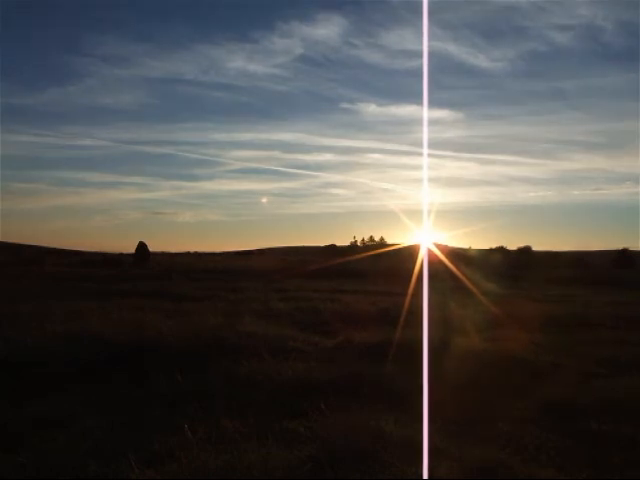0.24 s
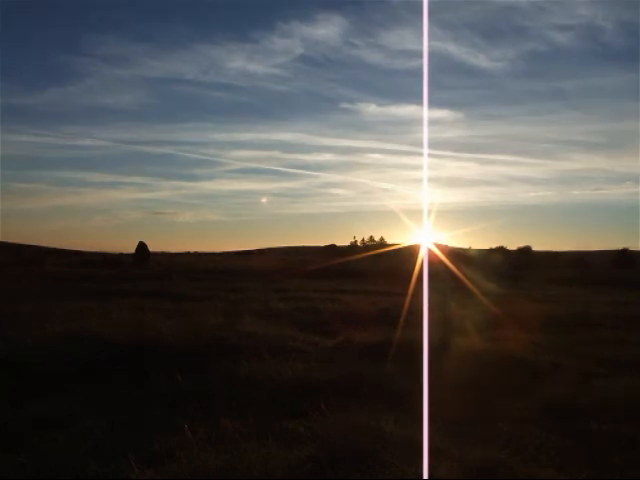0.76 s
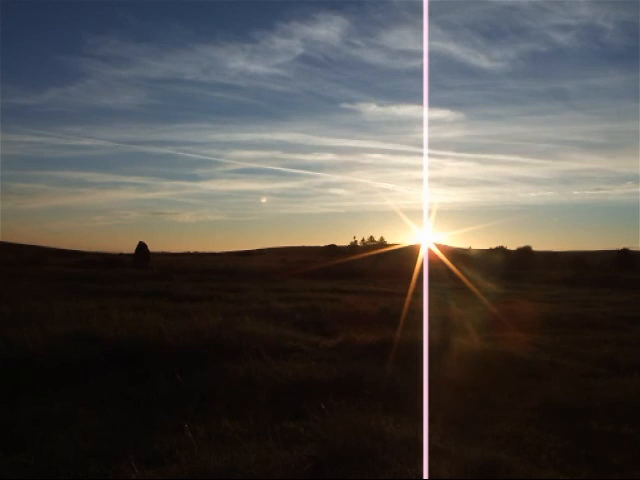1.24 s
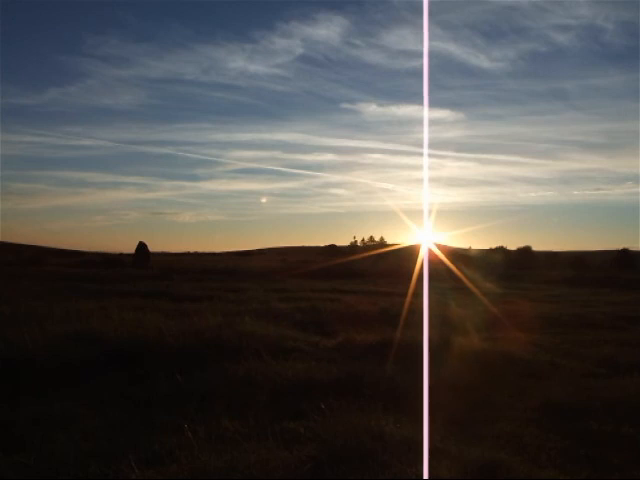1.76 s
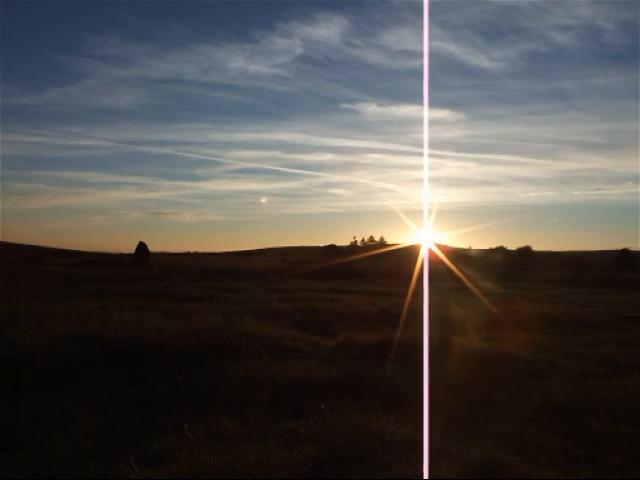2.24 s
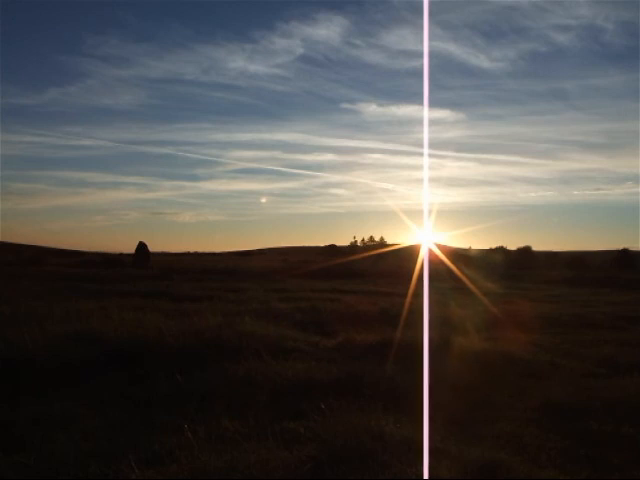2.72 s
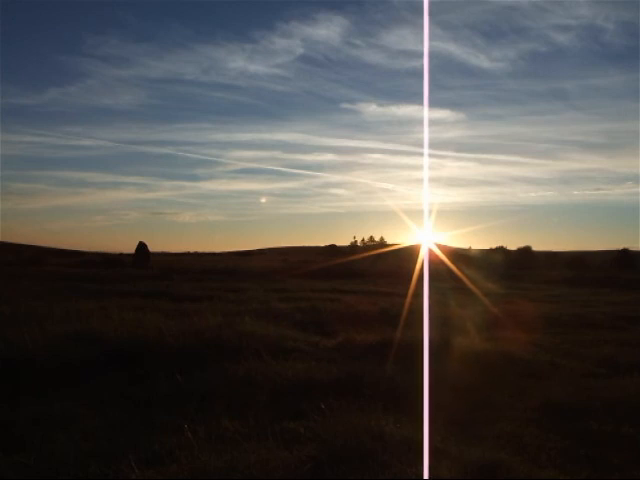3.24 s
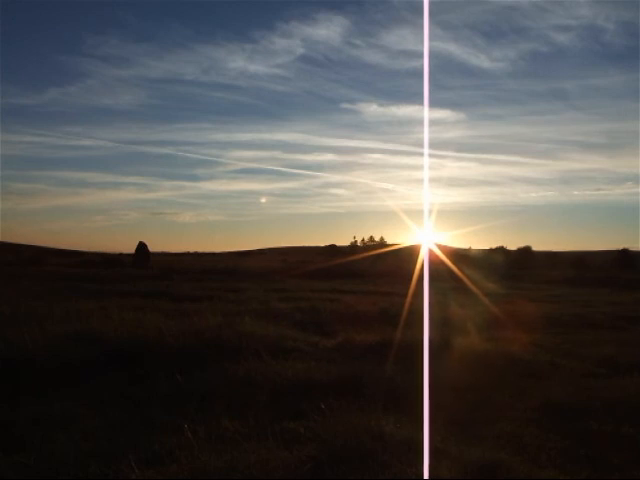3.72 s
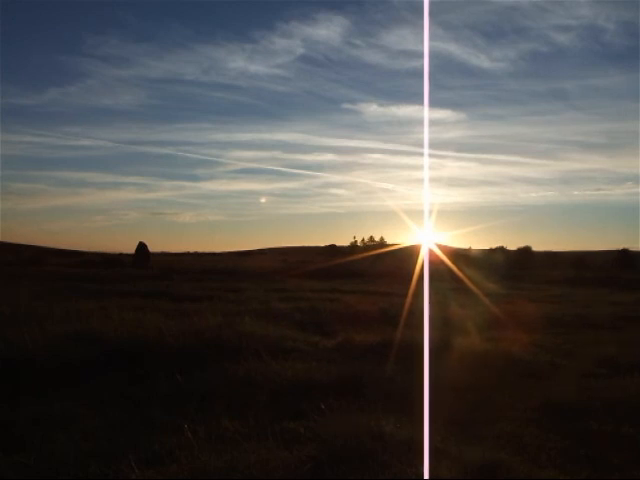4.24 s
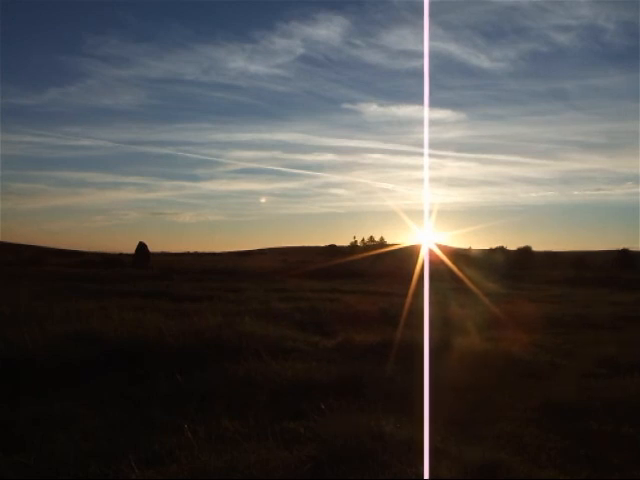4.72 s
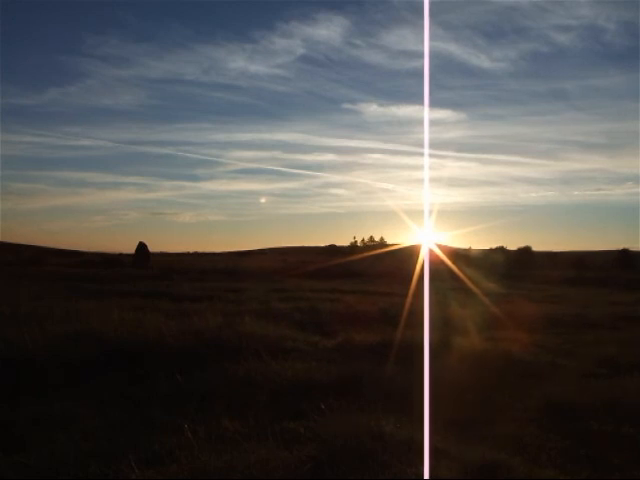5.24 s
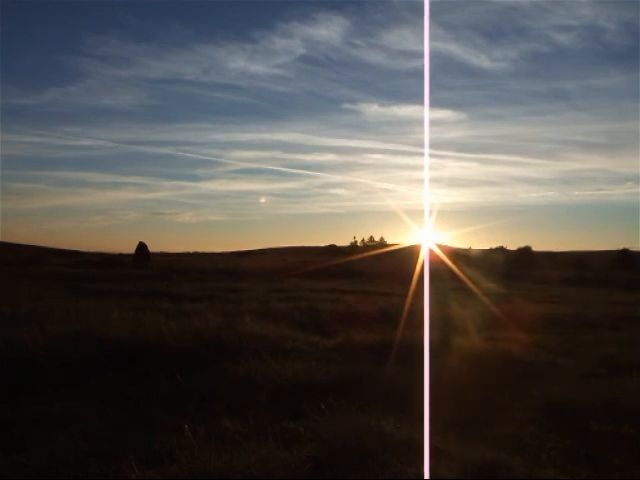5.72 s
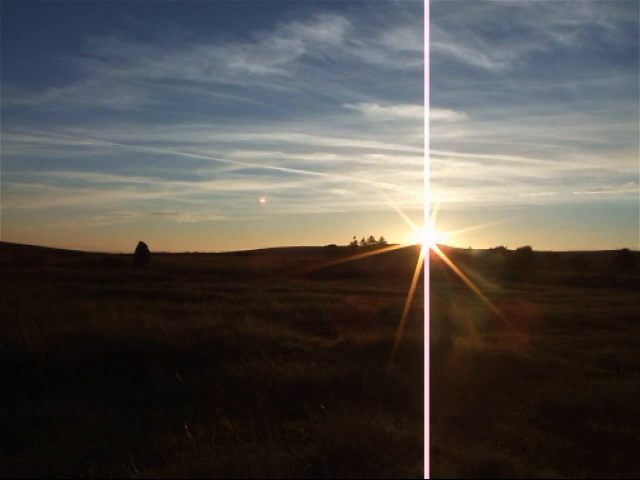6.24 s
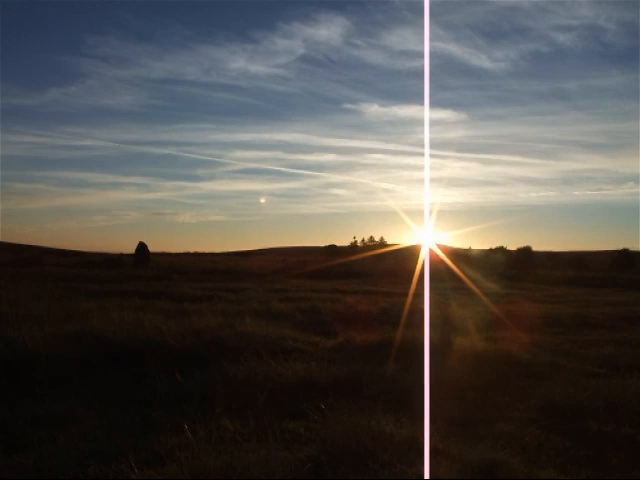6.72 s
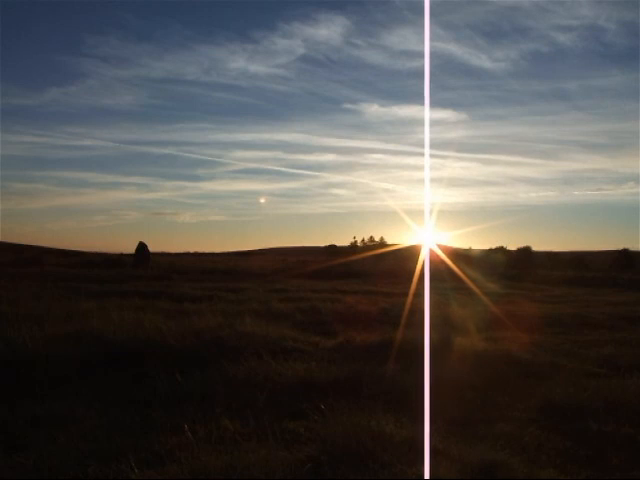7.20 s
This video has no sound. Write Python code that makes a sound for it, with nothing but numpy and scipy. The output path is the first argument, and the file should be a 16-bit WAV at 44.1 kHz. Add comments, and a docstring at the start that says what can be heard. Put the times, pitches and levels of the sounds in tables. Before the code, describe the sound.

Dawn birdsong on open moorland: rapid chirps, buzzes and rattling trills, with repeated down-sliding wader whistles and faint distant twitter.

```python
"""Open moorland at dawn: larks and pipits chirp, trill and warble close by, and a wader whistles again and again.
Gliding sines make the notes, fast pulses the trills, and sliding harmonics in a throat resonance the wader.
Far birds twitter in a soft noise hiss. A near-mono microphone with a low cut, a top cut and a faint whine
takes a few soft bumps; the birds leave a thin scattered tail and one faint echo."""
import sys
import numpy as np
from scipy import signal
from scipy.fft import rfft, irfft
from scipy.io import wavfile

SR = 44100
rng = np.random.default_rng(int(sys.argv[2]) if len(sys.argv) > 2 else 0)


def persist_wave(psi):
    """Save psi, clipped to +-1, as 16-bit WAV."""
    counts = np.round(np.clip(psi, -1, 1) * 32767).astype(np.int16)
    wavfile.write(sys.argv[1], SR, np.atleast_2d(counts).T)


N = 329407
TIME = np.arange(N) / SR
OPPOSITE = np.array([[1], [-1]])   # plus on the left, minus on the right


def from_db(db):
    """Decibels to a plain amplitude factor."""
    return 10 ** (np.asarray(db) / 20)


def rms_one(x):
    """Scale a signal to an rms of 1."""
    return x / np.sqrt(np.mean(x ** 2) + 1e-20)


def at_hz(points, hz):
    """Read a spectrum in dB on a log-frequency axis."""
    known_hz, db = np.transpose(points)
    return np.interp(np.log(np.maximum(hz, 1)), np.log(known_hz), db)


def drift(rate):
    """Random wandering with rms 1: straight lines between random points, rate points per second."""
    knots = rng.standard_normal(4000)
    return rms_one(np.interp(TIME * rate, np.arange(len(knots)), knots))


def span(start, length):
    """The samples of a note, its own clock in seconds and its progress 0-1."""
    where = slice(max(0, int(start * SR) + 1), min(N, int((start + length) * SR)))
    t = TIME[where] - start
    return where, t, np.clip(t / length, 0, 1)


def arc(u, first, middle, last):
    """A parabola through three values."""
    ends = (first * (1 - u) - last * u) * (1 - 2 * u)
    return ends + 4 * middle * u * (1 - u)


def fade(t, length, edge):
    """Straight ramps, edge seconds long, at both ends of a note."""
    return np.clip(np.minimum(t, length - t) / edge, 0, 1)


def settle(t, length, first, last, settle_s):
    """A pitch that moves quickly at first and levels out."""
    return first + (last - first) * np.expm1(-t / settle_s) / np.expm1(-length / settle_s)


def cycle(t, u, first_rate, last_rate):
    """Place 0-1 within the current beat of a rhythm that speeds up or slows."""
    return t * (first_rate + (last_rate - first_rate) * u / 2) % 1


def tone(hz, overtone_db=-200):
    """A gliding sine of rms 1, with its octave if asked."""
    phase = 2 * np.pi * np.cumsum(hz) / SR
    return np.sqrt(2) * (np.sin(phase) + from_db(overtone_db) * np.sin(2 * phase))


def add_chirp(out, start, length, hz0, hz1, hz2, db, roundness=0.38, flatness=2.2):
    """Add one swell of a nearly pure tone that glides through three pitches, lingering in the middle."""
    where, t, u = span(start, length)
    bend_hz = hz1 - (hz0 + hz2) / 2
    pitch = hz0 + (hz2 - hz0) * u + bend_hz * (1 - np.abs(2 * u - 1) ** flatness)
    swell = np.abs(np.sin(np.pi * u)) ** roundness
    out[where] += from_db(db) * swell * tone(pitch, overtone_db=-50.0)


def pulsed(t, length, pitch, db, rate0, rate1, duty, rise_hz, roundness=0.54, edge=0.0011):
    """The syrinx (a bird's voice box) opens and shuts; every pulse slides in pitch."""
    pulse = np.minimum(cycle(t, t / length, rate0, rate1) / np.clip(duty, .1, 1), 1)
    opening = np.abs(np.sin(np.pi * pulse)) ** roundness
    level = from_db(db) * fade(t, length, edge) * opening
    return level * tone(pitch + rise_hz * (pulse - .5), overtone_db=-61.0)


# color of the background hiss: pitch_hz, relative level_db (per Hz)
HISS_COLOR = [(300, 0), (450, -1), (800, -1.5), (1600, -2.5), (3000, -1.5), (4500, 0), (6000, -3),
              (7500, -7), (8600, -11.5), (9400, -18.5)]


def hiss():
    """Steady random noise of rms 1, shaped by the color table and falling away steeply above 9300 Hz."""
    hz = np.arange(N // 2 + 1) * SR / N
    top_edge = 1 / np.sqrt(1 + (hz / 9300) ** 80)
    spectrum = rfft(rng.standard_normal(N))
    return rms_one(irfft(spectrum * from_db(at_hz(HISS_COLOR, hz)) * top_edge, N))


# thin electronic tones: pitch_hz, level_db (rms)
WHINE_TONES = [(7799, -81), (7859, -71.5), (7889, -71), (7919, -79), (8081, -80), (8111, -72), (8141, -73),
               (8201, -83)]


def whine():
    """A cluster of faint electronic sines, each wandering slightly in pitch."""
    return sum(from_db(db) * tone(hz + 1.5 * drift(20)) for hz, db in WHINE_TONES)


# far singers: center_hz, pulses_per_s, level_db (rms)
FAR_BIRDS = [(4800, 70, -66), (3350, 62, -68)]


def far_birds(wander_hz=220, phrase_db=6):
    """Distant trills: pulsing tones of wandering pitch that swell and sink in the hiss."""
    out = np.zeros(N)
    for hz, rate, db in FAR_BIRDS:
        uneven_rate = rate * (1 + .15 * drift(6.5))
        pulses = np.sin(np.pi * np.cumsum(uneven_rate) / SR) ** 2
        phrases = from_db(phrase_db * np.clip(drift(6), -3, 1))
        pitch = hz + wander_hz * drift(10) + 120 * drift(300)
        out += from_db(db) * rms_one(pulses * phrases) * tone(pitch)
    return out


def far_chips(low_hz=2700, high_hz=5000, slide_hz=700, shortest_s=.008, longest_s=.035,
              db=-56, spread_db=6, count=60):
    """Faint chirps from far birds, at random times, lengths, pitches, slopes and levels."""
    out = np.zeros(N)
    for when, long, high, slope, loud in rng.random((count, 5)):
        length = shortest_s + (longest_s - shortest_s) * long
        hz, slide = low_hz + (high_hz - low_hz) * high, slide_hz * (slope - .5)
        add_chirp(out, when * N / SR, length, hz + slide, hz, hz - slide, db + spread_db * (loud - .5))
    return out


# the wader's calls (a negative start is already under way at time 0): start_s, length_s,
# top_hz (of the silent fundamental, before unsteadiness), fall_per_s, throat_focus (0-1),
# loss_by_end_db, harmonic_2_db, harmonic_3_db, harmonic_4_db (before throat, swell and effort)
WADER_CALLS = [(-0.35, 0.38, 1240, 1.85, 1, -11, -40, -45.5, -37),
               (0.704, 0.43, 1239, 1.86, 0.97, -11, -36.5, -46, -39),
               (1.808, 0.44, 1252, 1.43, 1, -7.5, -38.5, -48, -36),
               (2.988, 0.41, 1235, 1.84, 0.97, -9, -40, -47, -36.5),
               (3.821, 0.446, 1272, 1.5, 0.95, -6, -40, -48, -38.5),
               (4.349, 0.51, 1254, 0.88, 0.34, -15, -50.5, -45, -32)]
# the wader's throat resonance: pitch_hz, gain_db (at full focus)
THROAT = [(1700, -21.5), (2000, -15.5), (2250, -2.5), (2480, 0), (2900, -2), (3500, -16), (4200, -26.5),
          (5200, -18.5)]


def wader(scoop=0.41, scoop_s=.024, scoop_db=-7, hold_s=.072, knee_s=.1, edge=0.012, swell_s=0.1,
          waver=0.0028, third_s=0.25, third_share=1.0, lowest_hz=1720):
    """A scoop up and a long fall: harmonic after harmonic slides through the throat resonance."""
    out, unsteady = np.zeros(N), 1 + waver * drift(35)
    for start, length, top_hz, fall, focus, loss_db, *harmonic_db in WADER_CALLS:
        where, t, u = span(start, length)
        rise = 1 - scoop * np.exp(-(t / scoop_s) ** 1.2)
        falling_s = np.maximum(t - hold_s, 0)
        sinking = np.exp(-fall * falling_s ** 2 / (falling_s + knee_s))
        pitch = top_hz * rise * sinking * unsteady[where]
        effort = from_db(loss_db * u ** 2 + scoop_db * np.exp(-t / scoop_s)) * fade(t, length, edge)
        for k, db in enumerate(harmonic_db, 2):
            swell = 1
            if k == len(harmonic_db) + 1:   # the top harmonic comes late
                swell = 1 - np.exp(-(t / swell_s) ** 2)
            if k == 3:   # the third sinks after the scoop and returns
                after_scoop = 1 - np.exp(-(t / scoop_s) ** 4)
                swell = 1 - third_share * focus * np.exp(-(t / third_s) ** 4) * after_scoop
            beak = 1 / (1 + (lowest_hz / (k * pitch)) ** 20)   # radiates little below lowest_hz
            throat_db = focus * at_hz(THROAT, k * pitch)
            out[where] += effort * swell * beak * from_db(db + throat_db) * tone(k * pitch)
    return out * from_db(1.1 * drift(60))


# notes with a fast vibrato: kind, start_s, length_s, start_hz, middle_hz, end_hz,
# first_swings_per_s, last_swings_per_s, first_depth (0-1), last_depth (0-1), start_db, middle_db, end_db
# (pitches and levels are the slow arc under the swings)
WARBLES = [("twin", .0645, .15, 4130, 4440, 4300, 48.5, 44, 0.78, 1, -40, -36, -55),
           ("zigzag", .4218, .094, 5330, 4750, 4450, 128, 97, .3, 1, -32, -30.5, -39),
           ("zigzag", .5537, .095, 5330, 4750, 4400, 139, 89, .3, 0.91, -29.5, -32.5, -38),
           ("scallop", 2.537, 0.11, 4980, 4250, 3950, 63, 56, 0.93, .4, -28, -37, -38.5),
           ("toothed", 3.0605, .24, 4560, 4170, 4050, 51.3, 57, 0.9, 0.93, -33, -37, -43.5),
           ("rasp", 3.3722, .081, 5400, 4790, 4850, 96, 97, .7, 0.92, -36.5, -32.5, -34),
           ("rasp", 3.8337, .12, 4600, 4830, 4780, 104, 94, 0.92, 0.89, -37.5, -31, -34)]
# one swing of each kind of warble: share_of_swing (0-1), offset_hz (at depth 1), offset_db
SWINGS = {"twin": [(0, -950, -16), (.17, -500, -5.5), (.32, 750, 5.5), (.49, -500, -1), (.68, 1150, 0),
          (.85, -450, -1), (1, -950, -16)], "zigzag": [(0, -500, 3), (.35, 226, 2), (.55, 515, -5),
          (1, -500, 1.5)], "scallop": [(0, 329, -5), (.3, -150, 1), (.6, -120, -1), (1, 330, -5)],
          "toothed": [(0, -320, -4.5), (.3, -33, -1.5), (.6, 238, 0.5), (.7, -280, -6), (.81, 779, -2),
          (.92, -280, 1.5), (1, -320, -1.5)], "rasp": [(0, 1252, -19), (.15, 652, -1), (.3, -50, 5),
          (.48, -680, -6), (.68, -100, -3), (.85, 301, -19), (1, 503, -41)]}


def warbles(edge=.003, waver_hz=50):
    """One swing of pitch and level repeats quickly along a slow arc, widening or narrowing as it goes."""
    out, waver = np.zeros(N), waver_hz * drift(200)
    for kind, start, length, hz0, hz1, hz2, rate0, rate1, depth0, depth1, *db in WARBLES:
        where, t, u = span(start, length)
        share, swing_hz, swing_db = np.transpose(SWINGS[kind])
        beat = cycle(t, u, rate0, rate1)
        depth = depth0 + (depth1 - depth0) * u
        level = from_db(arc(u, *db) + np.interp(beat, share, swing_db)) * fade(t, length, edge)
        pitch = arc(u, hz0, hz1, hz2) + depth * np.interp(beat, share, swing_hz) + waver[where]
        out[where] += level * tone(pitch)
    return out


# the lark's motif (small arch, flick, up-tick, wide arch with a soft lead-in, down-slur),
# one list of points per note: time_s (unstretched), pitch_hz (untransposed), relative level_db
MOTIF = [
    [(.004, 2900, -11.5), (.007, 3930, -2), (.012, 4550, -3.5), (.017, 4680, 0.5), (.022, 4300, -3.5),
     (.027, 3200, -10.5)],
    [(.037, 6100, -14), (.04, 5350, 1.5), (.0435, 4900, -4.5)],
    [(.081, 2800, -16), (.084, 4100, -0.5), (.087, 4650, -10)],
    [(.1, 2850, -15), (.11, 3520, -6), (.116, 4500, -1), (.124, 4790, -2), (.139, 4890, -0.5),
     (.153, 4450, -1), (.163, 3400, -11)],
    [(.168, 6000, -12), (.171, 5200, 0.5), (.175, 4700, -1.5), (.186, 3300, -15)],
]
# each time it is sung: start_s, time_stretch (factor), transpose_hz, level_db
MOTIF_TIMES = [(0.1546, 0.99, -25, -30), (0.4275, 0.99, 71.5, -32.5), (1.2638, 1.01, -68.5, -34),
               (1.528, 1.034, 148, -32.5), (2.475, .985, -59.5, -39.5), (2.738, 1, 15, -37),
               (3.5191, 1.012, 21, -33.5)]


def motifs(edge=.001):
    """The same five gliding notes each time, a little faster or slower, higher or lower."""
    out = np.zeros(N)
    for start, stretch, shift_hz, db in MOTIF_TIMES:
        for note in MOTIF:
            s, hz, note_db = np.transpose(note)
            course = stretch * (s - s[0])
            where, t, u = span(start + stretch * s[0], course[-1])
            level = from_db(db + np.interp(t, course, note_db)) * fade(t, course[-1], edge)
            out[where] += level * tone(shift_hz + np.interp(t, course, hz), overtone_db=-54.0)
    return out


# straight slurs and pips: start_s, length_s, start_hz, end_hz, level_db
SLIDES = [(0.683, 0.0045, 4720, 5160, -31), (0.812, 0.043, 4660, 4290, -30.5),
          (0.8574, 0.026, 4770, 4230, -29.5), (1.914, 0.014, 4450, 4660, -35.5),
          (2.51, 0.03, 4700, 5000, -31.5), (2.633, .05, 4000, 3780, -39.5),
          (3.488, 0.0053, 4160, 5240, -32.5), (3.583, 0.0084, 4700, 5250, -30.5),
          (3.6056, .012, 5170, 5040, -26.5), (3.629, 0.012, 5290, 4970, -26.5),
          (3.652, 0.013, 5320, 5030, -26), (5.661, 0.0071, 4420, 4700, -33),
          (5.924, 0.014, 5250, 4330, -34), (6.187, 0.0026, 2300, 3200, -38),
          (6.435, 0.0054, 5240, 4000, -40), (6.465, .0086, 5000, 4350, -32),
          (7.426, 0.006, 4350, 4700, -38), (7.4318, 0.0031, 5200, 6000, -37.5),
          (5.678, 0.0046, 4400, 3500, -41), (5.693, 0.027, 2870, 2550, -50),
          (6.477, 0.006, 4470, 3000, -42), (5.935, 0.012, 3880, 2500, -47), (6.097, 0.022, 3200, 2190, -47),
          (6.173, 0.0046, 2500, 3200, -45)]
# bowed notes, arched or dipped: start_s, length_s, ends_hz, middle_hz, level_db
BOWS = [(3.016, 0.019, 5980, 5550, -34), (3.036, 0.025, 5650, 4770, -30.5),
        (3.7066, 0.069, 4060, 4630, -32.5), (5.949, 0.016, 1880, 2880, -43)]
# far low hoots: start_s, length_s, pitch_hz, level_db
HOOTS = [(4.377, 0.18, 666, -64), (4.595, 0.21, 665, -65.5)]


def single_notes():
    """Lone chirps: straight slurs, bowed notes, and far hoots on a level pitch."""
    out = np.zeros(N)
    for start, length, hz0, hz1, db in SLIDES:
        add_chirp(out, start, length, hz0, (hz0 + hz1) / 2, hz1, db)
    for start, length, end_hz, middle_hz, db in BOWS:
        add_chirp(out, start, length, end_hz, middle_hz, end_hz, db)
    for start, length, hz, db in HOOTS:
        add_chirp(out, start, length, hz, hz, hz, db)
    return out


# rattles of dipped pulses: start_s, length_s, base_hz, opening_drop_hz, fall_hz_per_s,
# first_period_s, slowing_time_s, level_db, fade_db_per_s
RATTLES = [(.692, .035, 4070, 520, 2500, .0098, .2, -33.5, 0),
           (0.753, .043, 4200, -4, 1490, .01, .23, -34.5, 0),
           (4.734, .31, 4750, 777, 5450, 0.0081, .125, -28, 94),
           (5.0858, .29, 4590, 640, 4700, .0087, .135, -29.5, 131),
           (6.009, .056, 4390, 2, 2500, 0.0091, .11, -37.5, 2),
           (6.3134, .077, 4910, 200, 15900, .0087, .2, -31, 599),
           (6.5547, .26, 4670, 458, 6970, 0.0083, 0.13, -31, 136),
           (6.873, .31, 4700, 349, 8450, 0.0089, .13, -34.5, 86)]


def rattles(settle_s=0.025, hold_s=0.046, widen_s=.008, pulse_s=0.0084, lowest_hz=3400, softest_db=-46.5,
            dip_hz=(350, -280, 520), narrow_s=0.3, clipped=.35, opening_s=.018):
    """Short ticks open into V-shaped pulses that nearly touch, then draw apart while pitch and level sink."""
    out = np.zeros(N)
    for start, length, base_hz, drop_hz, fall, period, slowing_s, db, fade_rate in RATTLES:
        t = 0
        while t < length:
            hz = max(base_hz - fall * t + drop_hz * np.exp(-t / settle_s), lowest_hz)
            level_db = max(db - fade_rate * max(t - hold_s, 0), softest_db)
            opened = 1 - clipped * np.exp(-t / opening_s)
            dip = np.multiply(dip_hz, opened ** 2 * np.exp(-t / narrow_s))
            add_chirp(out, start + t, pulse_s * opened, *(hz + dip), level_db, roundness=0.7, flatness=1.36)
            t += period + widen_s * (1 - np.exp(-(t / slowing_s) ** 2.2))
    return out


# even buzzes: start_s, length_s, start_hz, end_hz (before the droop), first_pulses_per_s,
# last_pulses_per_s, sounding_share (0-1 of a period), start_db, end_db (before the droop)
BUZZES = [(0.9258, 0.48, 3490, 3600, 58.5, 56.5, 0.4, -43, -48),
          (1.937, 0.079, 4410, 4234, 87, 84, 0.81, -34, -37.5),
          (2.005, 0.36, 4250, 4140, 83, 82, 0.76, -36, -36),
          (5.765, 0.457, 4517, 4070, 56.7, 51.4, 0.6, -30.5, -38.5),
          (6.235, 0.074, 4040, 3700, 95, 62, 0.61, -50, -46),
          (6.384, 0.24, 3100, 3400, 36, 43, 0.65, -49, -52),
          (6.691, 0.16, 4160, 3500, 45, 36, 0.95, -50, -50),
          (3.806, 0.026, 4130, 3830, 110, 104, 0.85, -40, -43)]


def buzzes(settle_s=.08, rise_hz=110, droop_s=0.037, droop_hz_per_s=300, droop_db_per_s=12):
    """Trains of nearly level pulses; the longer the buzz, the more it droops at its very end."""
    out = np.zeros(N)
    for start, length, hz0, hz1, rate0, rate1, duty, db0, db1 in BUZZES:
        where, t, u = span(start, length)
        tired = length * np.exp((t - length) / droop_s)
        pitch = settle(t, length, hz0, hz1, settle_s) - droop_hz_per_s * tired
        level_db = db0 + (db1 - db0) * u - droop_db_per_s * tired
        out[where] += pulsed(t, length, pitch, level_db, rate0, rate1, duty, rise_hz)
    return out


# two-note calls: start_s, first_hz, first_db, second_hz, second_db (pitches at the middle of each note)
COUPLETS = [(1.501, 3900, -42.5, 3150, -54), (2.7267, 4270, -37, 3000, -51),
            (2.818, 4250, -35.5, 3060, -48), (2.912, 4184, -37.5, 2880, -49),
            (3.511, 4050, -36.5, 3610, -40.5)]


def couplets(first_s=.018, second_s=.035, scoop_hz=300, fall_hz=180):
    """A short scooped note, and straight after it a lower, softer one that sinks."""
    out = np.zeros(N)
    for start, high_hz, high_db, low_hz, low_db in COUPLETS:
        add_chirp(out, start, first_s, high_hz + scoop_hz / 2, high_hz, high_hz + scoop_hz, high_db)
        add_chirp(out, start + first_s, second_s, low_hz + fall_hz, low_hz, low_hz - fall_hz, low_db)
    return out


# ticks along a slope: start_s, length_s, start_hz, end_hz, first_pulses_per_s, last_pulses_per_s,
# start_db, end_db
LADDERS = [(1.573, 0.035, 3840, 4130, 71, 64, -41, -38.5), (5.7863, 0.042, 5530, 4440, 71, 59, -41, -30),
           (5.829, 0.03, 4320, 3070, 97, 87, -35, -45), (6.083, 0.02, 3850, 3130, 100, 100, -36, -41),
           (7.448, .022, 4800, 4450, 93, 51, -27.5, -35), (5.744, 0.027, 5360, 5020, 132, 125, -40.5, -33),
           (7.3852, 0.026, 5350, 4820, 130, 124, -35.5, -31)]


def ladders(duty=0.53, rise_hz=620):
    """Separate rising ticks, each further along a straight slope of pitch and level."""
    out = np.zeros(N)
    for start, length, hz0, hz1, rate0, rate1, db0, db1 in LADDERS:
        where, t, u = span(start, length)
        pitch, level_db = hz0 + (hz1 - hz0) * u, db0 + (db1 - db0) * u
        out[where] += pulsed(t, length, pitch, level_db, rate0, rate1, duty, rise_hz)
    return out


# bumps on the microphone: start_s, peak_db (of the swell, before the low cut)
BUMPS = [(2.489, -35), (2.5134, -38)]


def bumps(hz=320, ring_s=0.0036):
    """Dull knocks: a low sine that swells and dies within a few cycles."""
    out = np.zeros(N)
    for start, db in BUMPS:
        where, t, u = span(start, 10 * ring_s)
        swell = (t / ring_s) ** 2 * np.exp(2 - 2 * t / ring_s)
        out[where] += from_db(db) * swell * np.sin(2 * np.pi * hz * t)
    return out


# the shape of the lark's repeated down-slur: time_s, drop_hz (rescaled to each slur's range), relative level_db
SLUR = [(0, 12, -11.5), (.004, 17, -4), (.012, 125, -1.5), (.018, 460, -.5), (0.023, 890, 1.5),
        (0.0253, 1000, -3), (.028, 700, -7.5), (.031, 800, -23)]
# the run, which slows a little and tends to creep up: start_s, top_hz, bottom_hz, level_db
SLUR_RUN = [(4.006, 5740, 5070, -26.5), (4.0687, 5760, 5100, -28.5), (4.132, 5790, 4930, -29.5),
            (4.1965, 5780, 4920, -29), (4.2607, 5800, 4950, -27.5), (4.326, 5890, 4900, -27),
            (4.3925, 5930, 4960, -26), (4.4595, 5960, 4840, -26.5), (4.5265, 5910, 4740, -28.5),
            (4.5945, 6050, 5000, -28.5), (4.662, 6080, 4970, -29.5)]


def slur_run(mirror_db=-36):
    """One falling glide over and over, with a faint image of it mirrored about 8 kHz."""
    out = np.zeros(N)
    s, drop_hz, shape_db = np.transpose(SLUR)
    for start, top_hz, bottom_hz, db in SLUR_RUN:
        where, t, u = span(start, s[-1])
        pitch = top_hz - (top_hz - bottom_hz) * np.interp(t, s, drop_hz / drop_hz.max())
        image = from_db(mirror_db) * tone(16000 - pitch)
        out[where] += from_db(db + np.interp(t, s, shape_db)) * (tone(pitch) + image)
    return out


# hooks: start_s, dip_length_s, pulses_per_s (average), peak_hz, level_db (at the middle of the dip)
HOOKS = [(5.09, 0.052, 85, 4900, -42), (5.4138, .072, 84, 4690, -39), (6.7304, 0.051, 74, 4700, -34),
         (7.0537, 0.056, 83, 4820, -32)]
# the dip every hook shares: start_hz, middle_hz, end_hz
HOOK_DIP = (5250, 4000, 4250)


def hooks(duty=.6, rise_hz=800, slowing=0.068, fade_db=6, whistle_s=0.0456, whistle_db=-1, shoulder_hz=700):
    """Pulses swoop down and turn up again, then run into one peaked whistle."""
    out = np.zeros(N)
    for start, length, rate, peak_hz, db in HOOKS:
        where, t, u = span(start, length)
        rates = rate * (1 + slowing), rate * (1 - slowing)
        level_db = db + fade_db * (.5 - u)
        out[where] += pulsed(t, length, arc(u, *HOOK_DIP), level_db, *rates, duty, rise_hz * (1 - u) ** 2)
        side_hz = peak_hz - shoulder_hz
        add_chirp(out, start + length, whistle_s, side_hz, peak_hz, side_hz, db + whistle_db, flatness=1.4)
    return out


# a second singer's flourishes: start_s, spacing_stretch (factor), transpose_hz, level_db
FLOURISHES = [(5.2229, 1.01, 86, -36), (5.5515, 1.04, 32, -35), (6.8631, 1.04, -130, -30),
              (7.1914, 1.04, -110, -30.5)]
# the course of a flourish: share_of_strokes (0-1), pitch_hz (untransposed), rise_in_stroke_hz, relative level_db
FLOURISH_COURSE = [(0, 5250, 1100, -1), (.15, 4650, 1050, 1), (.7, 4100, 800, -3.5), (.9, 3380, 500, -7),
                   (1, 3050, 550, -3)]


def flourishes(stroke_s=.0056, period_s=.0102, easing_s=.0002, fastest=3.4, count=11):
    """Steep upstrokes step down in pitch, quickest about a third of the way through."""
    out = np.zeros(N)
    share, *course = np.transpose(FLOURISH_COURSE)
    for start, stretch, shift_hz, db in FLOURISHES:
        for k in range(count):
            hz, rise_hz, stroke_db = (np.interp(k / (count - 1), share, c) for c in course)
            glide = hz + shift_hz + rise_hz * np.array([-.5, 0, .5])
            add_chirp(out, start, stroke_s, *glide, db + stroke_db, roundness=0.89)
            start += stretch * (period_s + easing_s * (k - fastest) ** 2)
    return out


# slow wavy whistles: start_s, length_s, first_waves_per_s, last_waves_per_s, level_db (before the sag)
WAVES = [(5.472, .154, 39.5, 35.7, -34), (7.238, .15, 38.2, 37, -34.5)]


def waves(top_hz=4450, sag_hz=340, sag_db=4, rise_hz=220):
    """Pulses so long that they touch; pitch and level hold, then sag together towards the end."""
    out = np.zeros(N)
    for start, length, rate0, rate1, db in WAVES:
        where, t, u = span(start, length)
        sag = u ** 3.17
        out[where] += pulsed(t, length, top_hz - sag_hz * sag, db - sag_db * sag, rate0, rate1, 1.0, rise_hz)
    return out


# a far bird's slow chatter: start_s, length_s, start_hz, end_hz, strokes_per_s, slide_in_stroke_hz,
# level_db (before the unevenness)
CHATTER = [(5.857, 0.37, 2400, 2000, 33, 500.5, -62), (5.924, 0.36, 3770, 3310, 42, -600, -54),
           (6.201, 0.4, 2496, 3040, 29, -600, -54), (6.274, 0.365, 1995, 2273, 29, 628.5, -53)]


def chatter(duty=.36, unsteady_s=.002, wander_hz=70, uneven_db=3.0):
    """Slow, steep strokes up and down, far away and never quite even in time, pitch or level."""
    out, late, wander = np.zeros(N), unsteady_s * drift(20), wander_hz * drift(30)
    for start, length, hz0, hz1, rate, slide_hz, db in CHATTER:
        where, t, u = span(start, length)
        pitch = hz0 + (hz1 - hz0) * u + wander[where]
        out[where] += pulsed(t + late[where], length, pitch, db, rate, rate, duty, slide_hz)
    return out * from_db(uneven_db * drift(30))


def moor(x, t60):
    """Heather and slopes scatter a thin noise tail that dies by 60 dB in t60 seconds."""
    t = TIME[:SR // 2]
    tail = rng.standard_normal(len(t)) * from_db(-60 * t / t60) * (t > .003)
    return signal.fftconvolve(x, tail / np.linalg.norm(tail))[:N]


def slope_echo(x, delay_s=.1, echo_db=-26):
    """A nearby slope returns the song once, late and smeared."""
    return from_db(echo_db) * np.interp(TIME - delay_s, TIME, moor(x, t60=.2), left=0)


def placed(x, pan_db):
    """Two channels whose levels, left minus right, differ by pan_db."""
    return x * from_db(pan_db / 2 * OPPOSITE)


def scene(uneven_db=0.87, hiss_db=-50.5, side_db=-33, scatter_db=-26, width_db=-27):
    """Near singers almost in the middle, their scatter a little wider, a faint echo, all over the hiss."""
    lark = motifs() + couplets() + single_notes() + warbles() + slur_run()
    trills = rattles() + ladders() + hooks() + buzzes() + waves() + chatter() + flourishes()
    trillers = from_db(uneven_db * drift(90)) * trills   # the level flickers slightly
    whistles = wader()
    direct = placed(lark, -.6) + placed(trillers, -.45) + placed(whistles, -.2)
    birds = lark + trillers + whistles
    scatter = from_db(scatter_db) * moor(birds, t60=0.26)
    width = from_db(width_db) * moor(birds, t60=.06) * OPPOSITE
    air = from_db(hiss_db) * (hiss() + from_db(side_db) * hiss() * OPPOSITE)
    far = slope_echo(birds) + far_birds() + far_chips()
    return direct + scatter + width + far + bumps() + whine() + air


def record(dry):
    """The microphone's steep low cut at 300.4 Hz, and a sharp top cut at 10900 Hz."""
    low_cut = signal.butter(16, 300.4, "high", fs=SR, output="sos")
    top_cut = signal.ellip(10, .1, 80, 10900, fs=SR, output="sos")
    return signal.sosfilt(top_cut, signal.sosfilt(low_cut, dry))


dry = scene()
out = record(dry)
persist_wave(out)
```